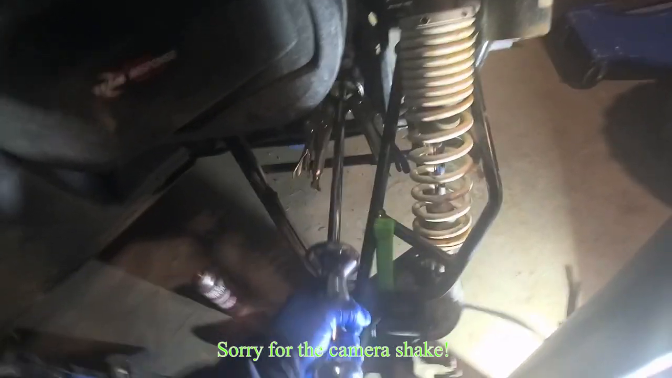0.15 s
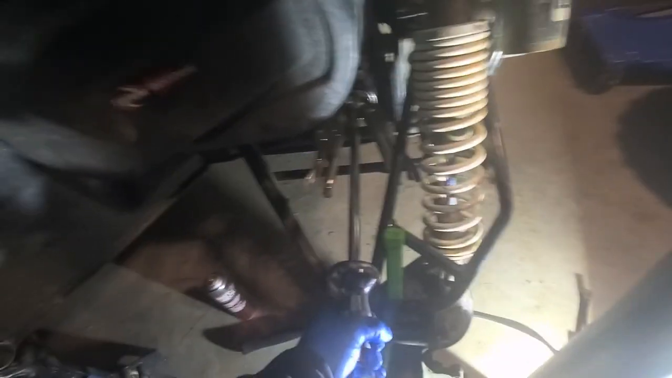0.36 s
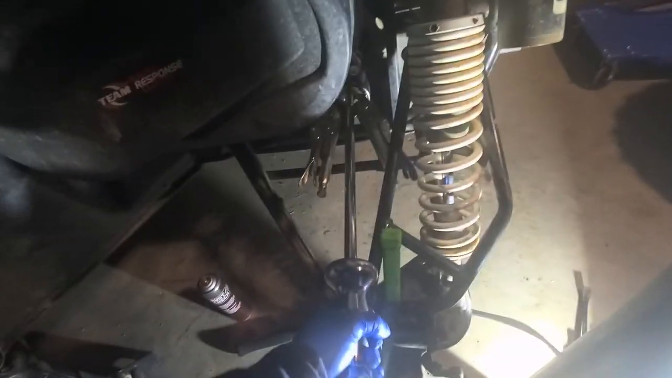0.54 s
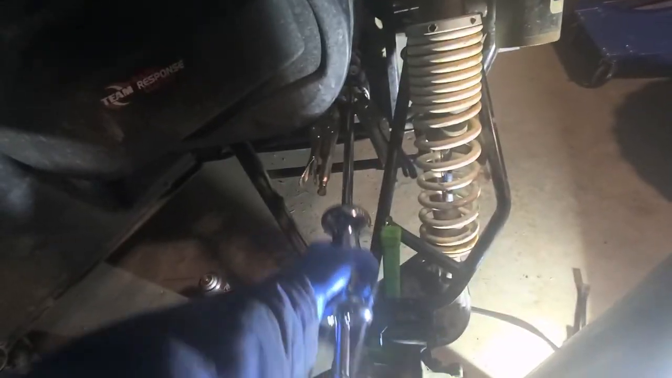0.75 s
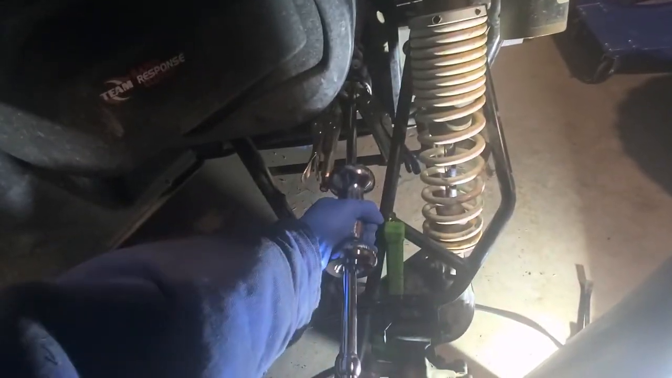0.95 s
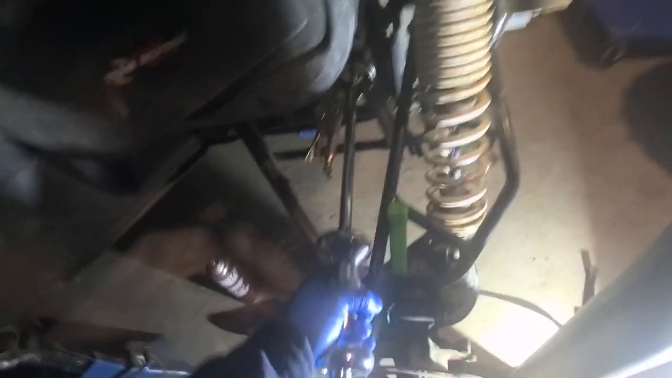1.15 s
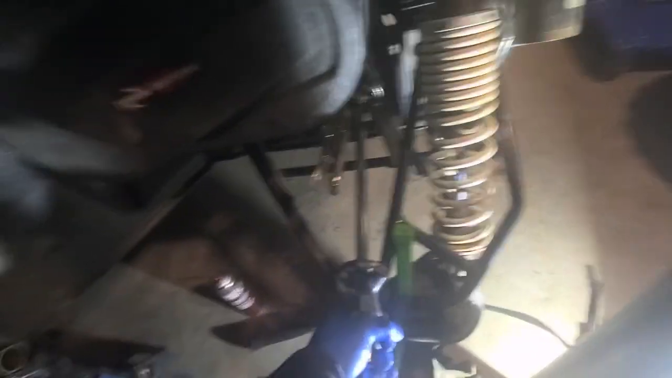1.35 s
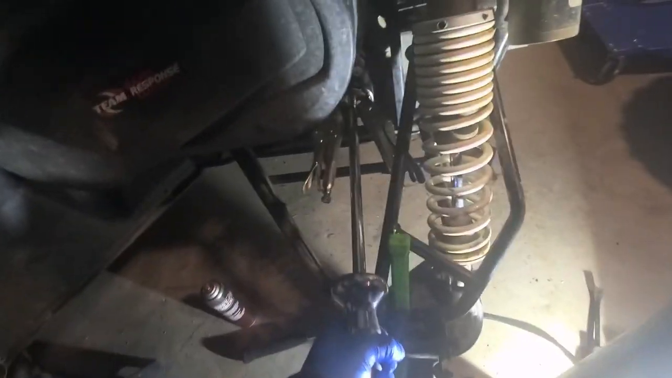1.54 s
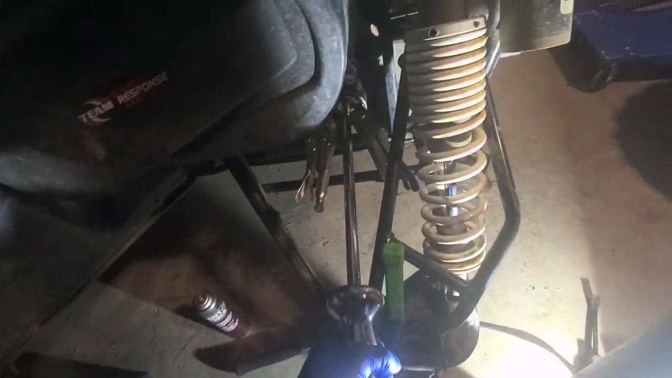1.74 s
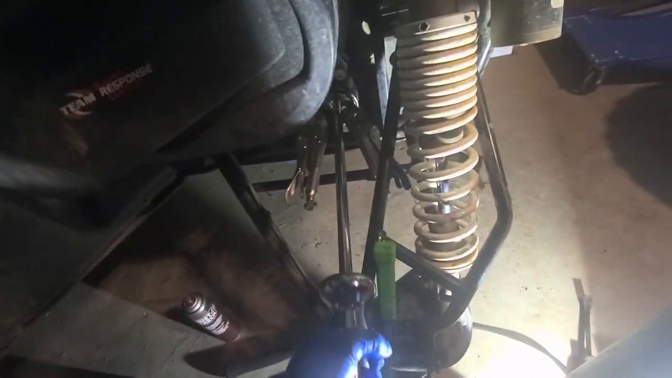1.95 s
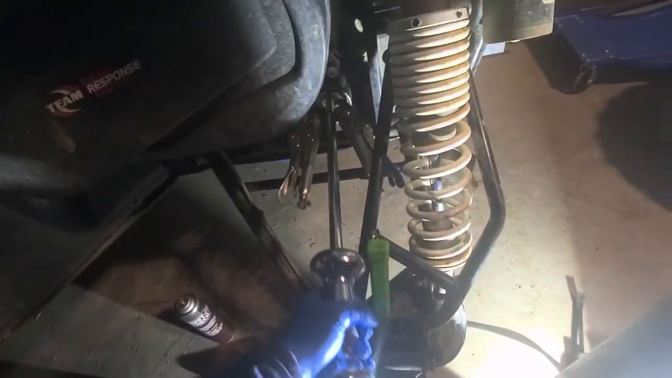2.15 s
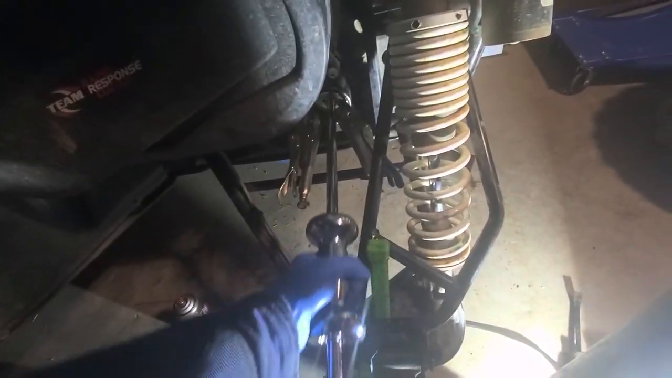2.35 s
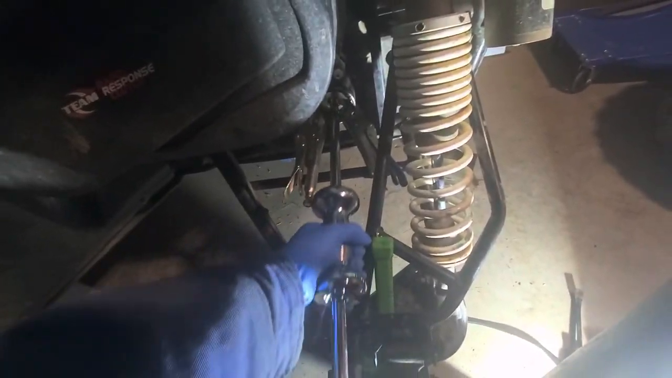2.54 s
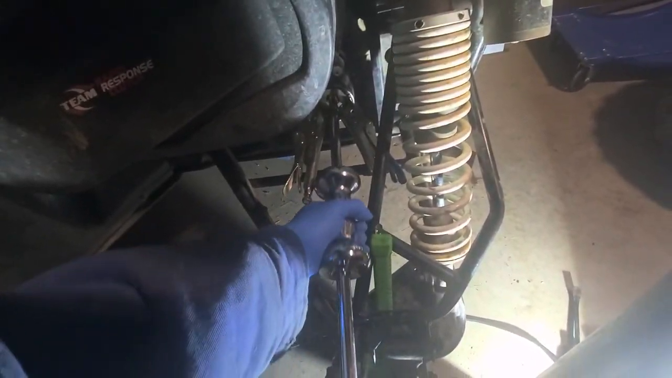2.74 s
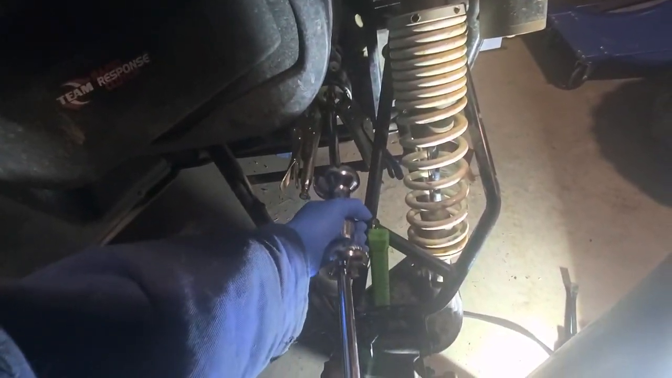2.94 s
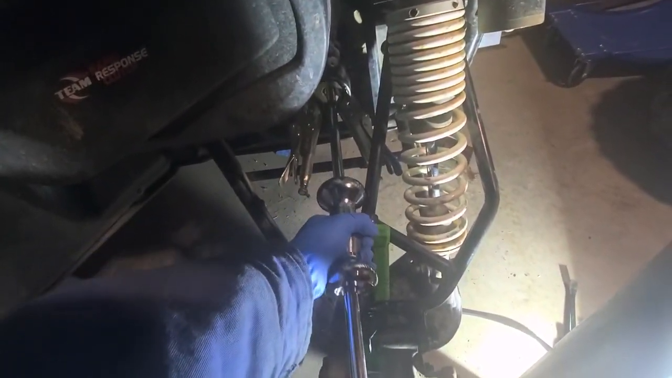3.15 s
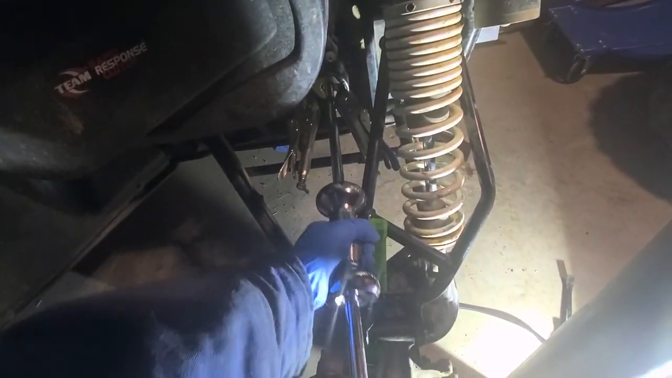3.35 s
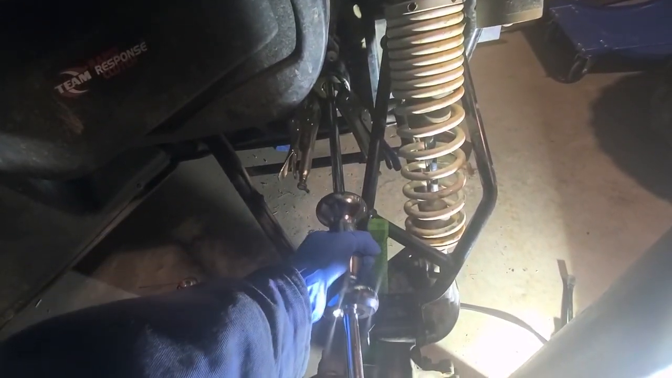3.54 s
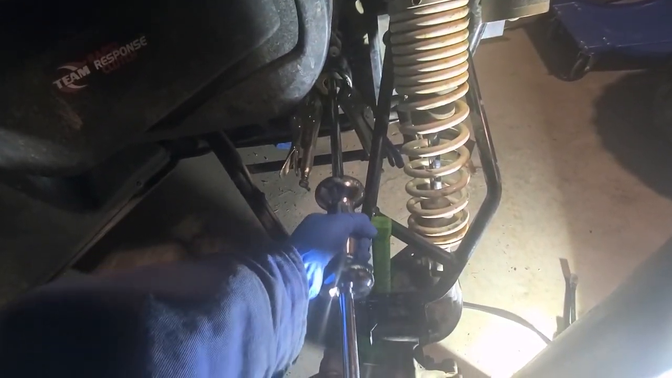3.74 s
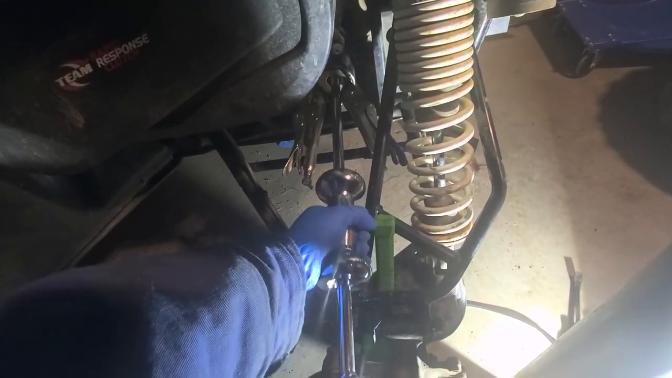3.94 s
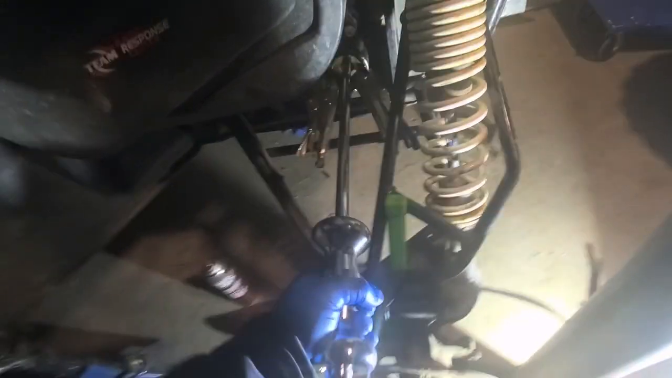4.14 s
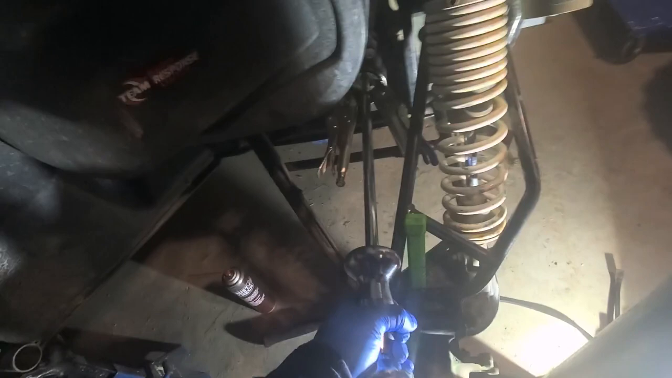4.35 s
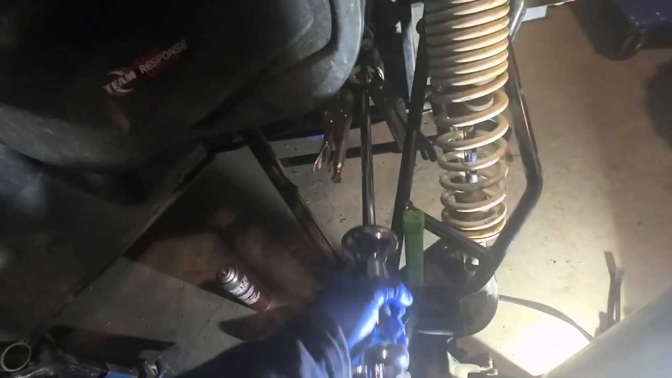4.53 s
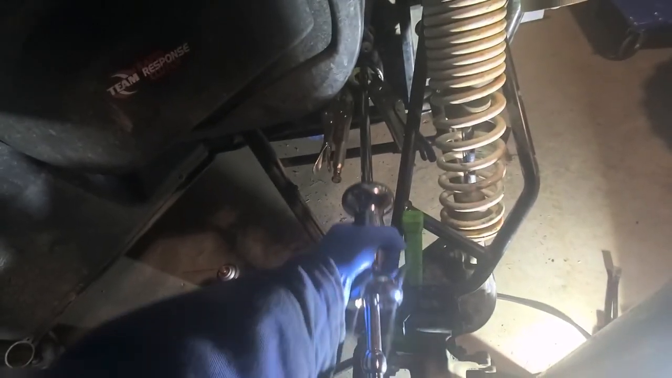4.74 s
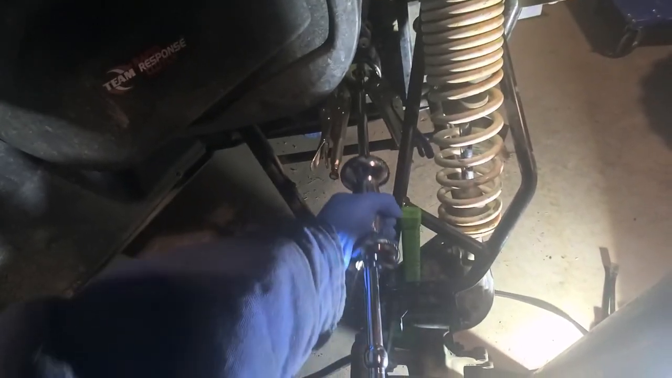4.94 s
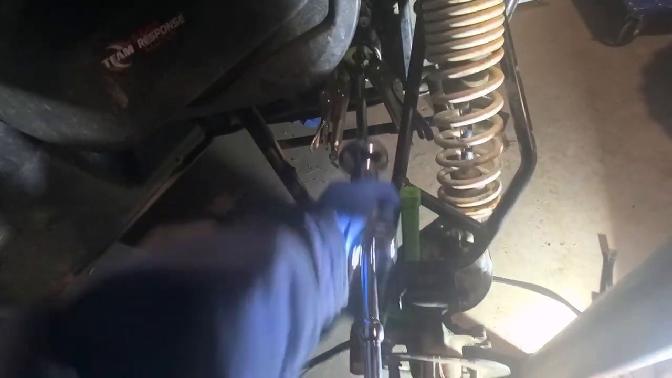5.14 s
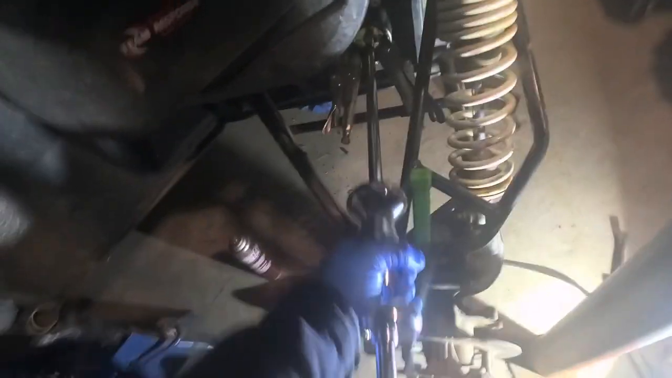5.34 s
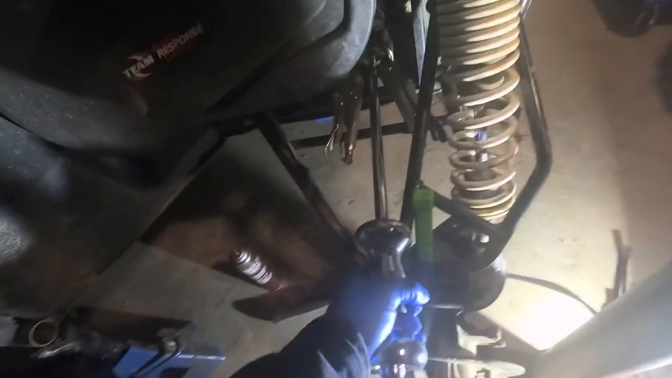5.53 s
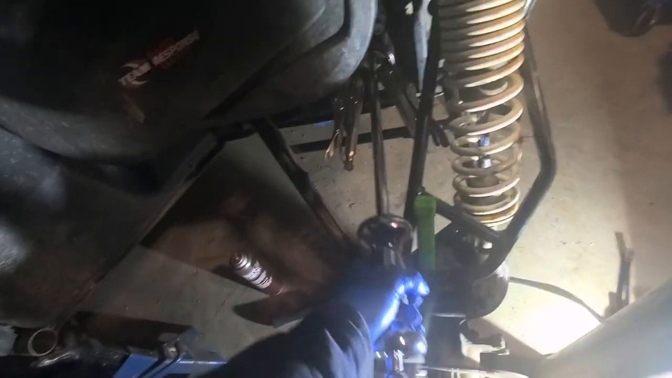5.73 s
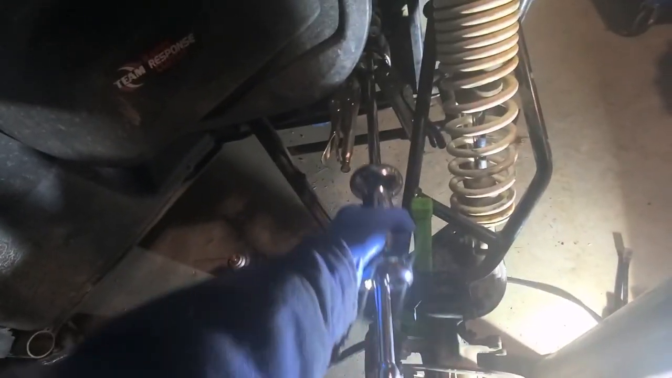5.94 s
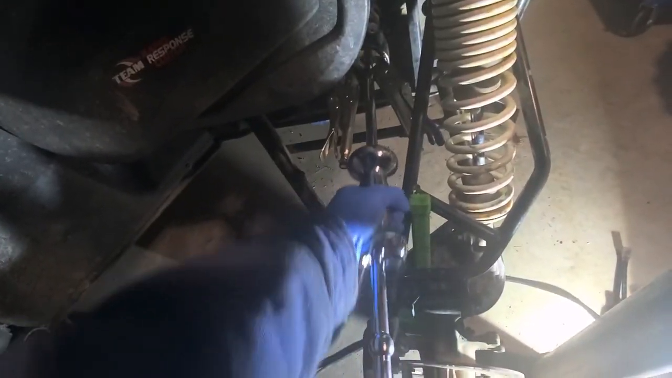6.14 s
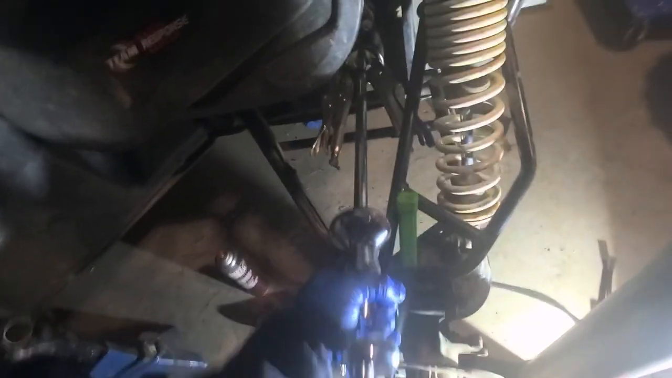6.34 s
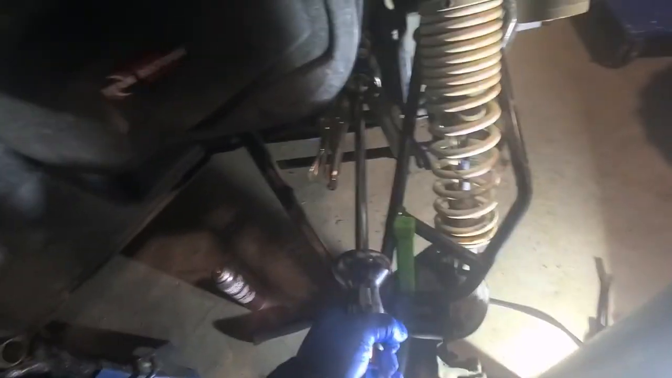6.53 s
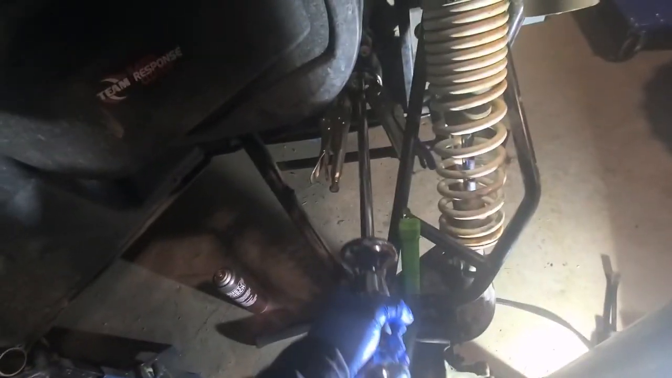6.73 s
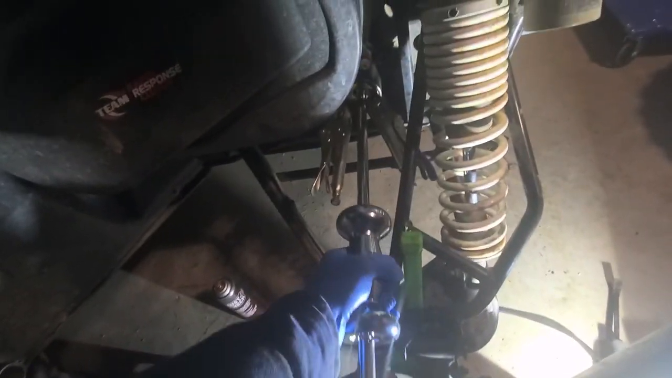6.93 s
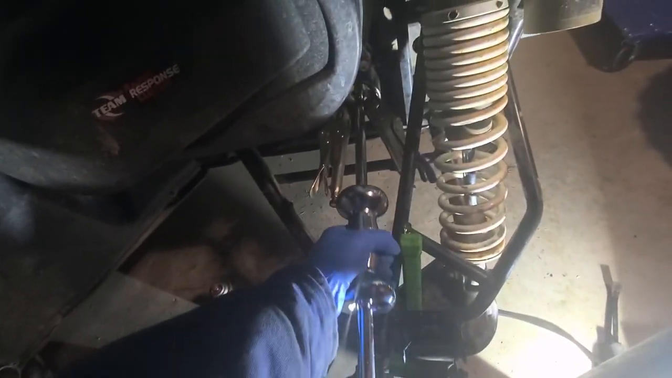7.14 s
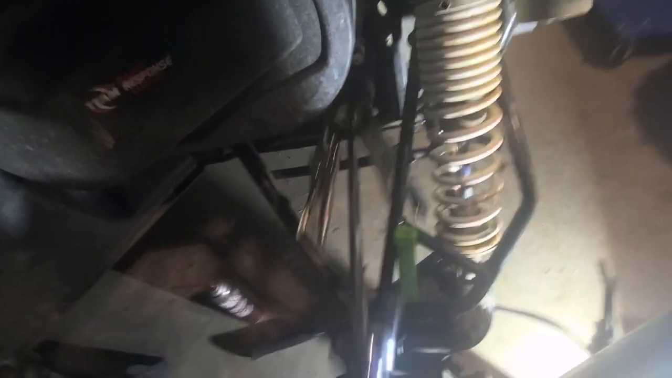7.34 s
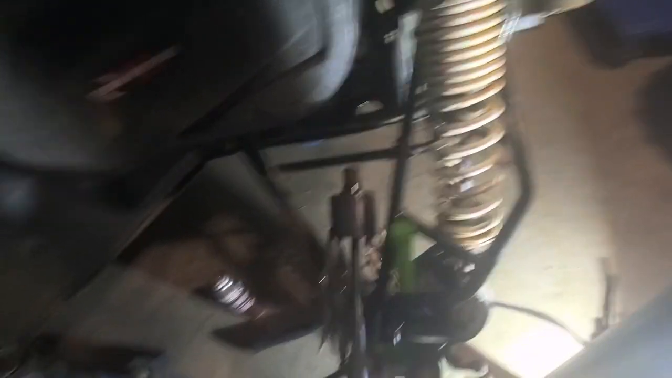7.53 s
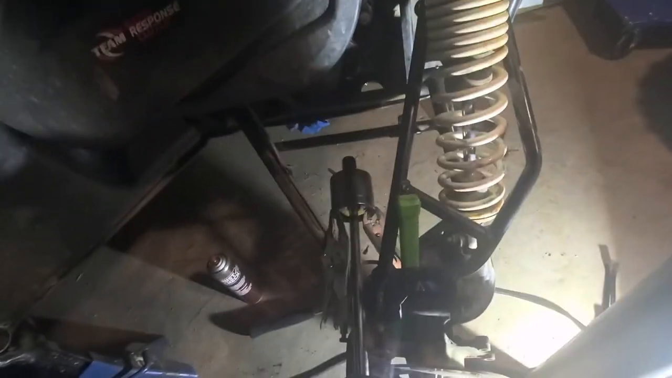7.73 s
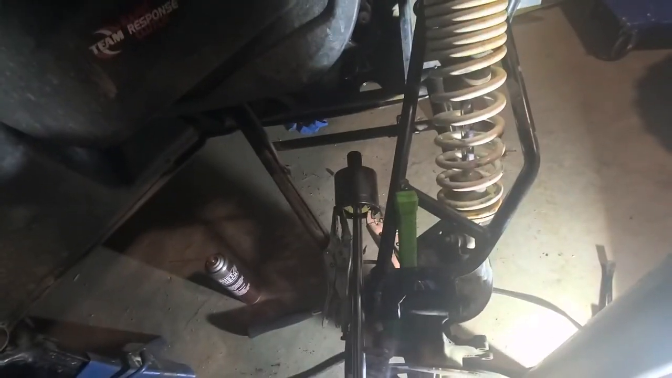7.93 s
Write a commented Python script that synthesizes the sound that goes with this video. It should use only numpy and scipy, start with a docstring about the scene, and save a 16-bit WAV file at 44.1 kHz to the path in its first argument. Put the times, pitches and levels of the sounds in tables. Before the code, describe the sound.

A heavy steel weight slides along a rod and clanks hard against its stop six times, then the tool bangs loose onto a metal frame.

```python
"""In a garage, a slide hammer is yanked again and again at a car's suspension, close to a stereo microphone.
The weight scrapes along the rod and clanks on the stop: noise bursts and struck decaying modes. Its blows
shake the chassis, it is pushed back with small taps, and dull knocks fall between. At last the puller comes
free, bangs onto the frame and bounces. Diffuse echoes answer, and a low rumble of shaped noise fills the room."""
import sys
import numpy as np
from scipy import signal
from scipy.fft import rfft, irfft
from scipy.io import wavfile

SR = 44100
rng = np.random.default_rng(int(sys.argv[2]) if len(sys.argv) > 2 else 0)


def put_to_file(sound):
    """Save the sound as 16-bit audio at rate SR, in the file named by the first command-line argument."""
    columns = np.atleast_2d(sound).T  # one column per channel
    safe = np.clip(columns, -1, 1)
    whole_steps = np.round(safe * 32767)
    wavfile.write(sys.argv[1], SR, whole_steps.astype(np.int16))


N = 351918

# Levels in the tables are relative, ahead of the mix.
# Building rumble. Each row: frequency in Hz, level in dB per Hz.
RUMBLE_SPECTRUM = [(15, -36.5), (25, -5), (59, -4.5), (149, -9.5), (217, -0.5), (285, -7.5), (439, -8.5),
                   (734, -23), (863, -22.5), (1190, -23.5), (3720, -38), (7510, -53), (13600, -44.5),
                   (16000, -61)]
# Blurred hums within it. Each row: centre in Hz, width in Hz, level in dB.
RUMBLE_HUMS = [(50, 10, 4), (217, 10, 8), (337, 6, 5), (375, 5, 4), (515, 3, 4)]
# Level of the low noise: the recorder holds it down before hits, and it rises under the last crash.
# Each row: time in seconds, level in dB.
RUMBLE_LEVEL = [(0, -62), (0.599, -56), (1.7, -58), (2.2, -65), (2.289, -65), (2.6, -55), (2.999, -62),
                (3.12, -61), (3.471, -62), (3.951, -58.5), (4.699, -56.5), (5.2, -66.5), (6.12, -63.5),
                (6.207, -65), (6.499, -59), (7.201, -61), (7.299, -85), (7.7, -41.5)]
# Weight sliding on the rod. Each row: start in seconds, length in seconds, first level in dB, last level in dB.
SLIDES = [(0.06, 0.051, -55, -69.5), (0.146, 0.068, -34, -44), (0.61, 0.031, -55.5, -50.5),
          (0.697, 0.096, -56, -58.5), (0.895, 0.12, -66, -75), (1.119, 0.031, -68.5, -66),
          (1.148, 0.033, -28, -32.5), (2.28, 0.13, -74, -67.5), (2.383, 0.21, -78, -79),
          (2.609, 0.05, -57, -60.5), (3.174, 0.062, -62, -53), (3.498, 0.083, -63.5, -78.5),
          (4.103, 0.05, -71.5, -62), (4.141, .029, -22, -22), (4.537, 0.069, -56, -43),
          (4.626, 0.13, -76, -75), (4.817, 0.16, -58.5, -80), (5.24, .055, -41, -42.5),
          (5.773, 0.021, -50.5, -59), (5.805, 0.26, -69, -70.5), (6.151, 0.028, -69, -76.5),
          (6.228, 0.1, -60, -39.5), (6.735, 0.22, -74, -64), (7.018, 0.065, -50, -75.5),
          (7.122, 0.048, -72, -83), (7.308, 0.054, -62, -41.5), (7.762, 0.036, -35.5, -44)]
# Weight touching rod or collar. Each row: start in seconds, ring level in dB, tick level in dB.
TAPS = [(0.0638, -59.5, -49), (0.616, -60, -53.5), (0.6946, -54.5, -55), (0.7390, -49, -40.5),
        (0.9007, -66.5, -53), (0.9628, -51, -40.5), (1.054, -66, -58.5), (1.883, -74.5, -65),
        (2.019, -73.5, -74.5), (2.352, -71, -64.5), (2.3785, -48, -45), (2.6215, -55.5, -39),
        (2.6574, -57, -38), (2.797, -57.5, -50), (3.1729, -55, -39), (3.2058, -53, -29.5),
        (3.224, -48, -35), (3.5129, -48.5, -38), (3.6212, -70.5, -58), (4.5444, -46.5, -45),
        (4.575, -46, -44.5), (4.6, -55, -40), (4.7636, -72.5, -50), (4.8223, -44.5, -42),
        (4.91, -78, -47.5), (4.9756, -75.5, -48), (5.769, -63.5, -54.5), (6.0811, -84, -51),
        (6.792, -59, -55), (6.846, -66.5, -58), (6.9172, -64.5, -47.5), (6.97, -64.5, -50.5),
        (7.0036, -44.5, -39), (7.128, -63, -46), (7.157, -67, -60), (7.7707, -57, -38),
        (7.7842, -41.5, -29.5), (7.797, -54, -45)]
# Weight on the stop. Each row: start in seconds, clank level in dB, clank hold in seconds, ring level in dB,
# level of the shock sent to the room in dB.
BLOWS = [(0.199, -14, 0.0081, -25.5, 20.5), (1.201, -14, 0.014, -24, 20),
         (4.186, -11.5, 0.006, -17.5, 21.5), (5.300, -20, 0.017, -14.5, 16.5),
         (6.320, -18.5, 0.0152, -17.5, 17), (7.378, -18.5, 0.013, -20.5, 18.5)]
# Rod and weight, ringing freely. Each row: mode in Hz, level in dB, 60 dB decay in seconds.
ROD_MODES = [(2030, -14, .03), (2290, -18, .1), (2910, -9, .035), (3780, -8, .025), (3990, -14, .04),
             (5230, 0, .05), (5850, -10, .04), (6520, -6, .07), (6860, -14, .05), (8010, -1, .06),
             (8600, -14, .05), (9100, -14, .04), (9650, -4, .06), (10850, -14, .05), (11390, -1, .07),
             (12400, -20, .04), (13250, -9, .06), (15170, -20, .04)]
# Bare noise of steel on the stop. Each row: frequency in Hz, level in dB per Hz.
CLANK_SPECTRUM = [(290, -42.5), (500, -14), (3770, -7.5), (4550, -10), (5190, -2.5), (7270, -6.5),
                  (7940, -1), (8800, -5.5), (11600, -2), (15600, -13.5), (16500, -27)]
# Chassis shaken through the puller. Each row: start in seconds, thump level in dB, panel level in dB.
SHAKES = [(0.204, -10.5, -24), (0.747, -42, -62), (0.966, -29.5, -51), (1.07, -45, -64),
          (1.214, -16.5, -27), (2.377, -41.5, -60), (2.625, -29, -49), (3.214, -38, -44.5),
          (3.52, -41, -51), (4.197, -15.5, -27), (4.832, -28, -49.5), (5.309, -20.5, -32),
          (6.335, -21, -31.5), (7.013, -26, -60.5), (7.135, -44, -58), (7.382, -30.5, -35.5),
          (7.52, -27, -19)]
# Chassis panels. Each row: mode in Hz, level in dB, 60 dB decay in seconds.
PANEL_MODES = [(140, 2, 0.022), (181.3, 1.5, 0.091), (218, -3.5, 0.12), (266.6, -4.5, 0.091),
               (327, -3, 0.057), (395, -3.5, 0.071), (437.3, -12, 0.17), (599, -14, 0.024),
               (742, -10, 0.051)]
# Sway of the whole chassis. Each row: mode in Hz, level in dB, 60 dB decay in seconds.
SWAY_MODES = [(53, 0, .5)]
# Thump of the whole chassis. Each row: mode in Hz, level in dB, 60 dB decay in seconds.
THUMP_MODES = [(98, 0, .075)]
# Dull knocks near a kilohertz. Each row: start in seconds, level in dB.
KNOCKS = [(1.583, -58), (1.618, -53.5), (2.986, -65), (3.175, -45.5), (3.204, -38.5), (5.643, -58.5),
          (5.675, -50.5)]
# Modes of a knock. Each row: mode in Hz, level in dB, 60 dB decay in seconds (ring() allows 5 ms at least).
KNOCK_MODES = [(723, -1.5, 0.047), (1170, 8.5, 0.0033), (1425, -3, 0.032)]
# Freed puller banging and bouncing on the frame. Each row: start in seconds, level in dB.
BANGS = [(7.518, 4.5), (7.571, -4.5), (7.598, -5), (7.638, -17.5), (7.745, -12.5)]
# Frame under the puller. Each row: mode in Hz, level in dB, 60 dB decay in seconds.
FRAME_MODES = [(161.7, -4, 0.18), (206, -0.5, 0.1), (312.4, -0.5, 0.075), (383.3, -11, 0.12),
               (513.4, -10.5, 0.058), (697, -5, 0.072), (751.4, -6, 0.067), (866, -21, 0.42),
               (1266, -13, 0.098), (1730, -26, 0.041), (1984, -10.5, 0.16), (2300, -21, 0.029),
               (3030, -25.5, 0.03), (3850, -27, 0.047)]
# Tone of the garage echoes. Each row: frequency in Hz, level in dB.
ROOM_COLOUR = [(60, 1.5), (250, -1.5), (700, 3.5), (1500, -3.5), (3000, -1.5), (5500, -4.5), (7300, -8),
               (9000, -5), (12000, -5.5), (16000, 0)]
# Dying away of the echoes. Each row: frequency in Hz, 60 dB decay in seconds.
ECHO_T60 = [(60, 1), (280, 0.7), (740, 0.58), (1940, 0.41), (5120, 0.44), (13500, 0.28)]
# Left-right likeness of diffuse sound. Each row: frequency in Hz, likeness from -1 to 1.
LIKENESS = [(60, 1), (180, 0.96), (550, 0.69), (1650, 0.46), (4970, -0.15), (15000, -0.47)]
# Phase between the microphone ports. Each row: frequency in Hz, lead of the left in radians.
LEFT_LEAD = [(100, 0), (500, 0), (1500, 1.4), (4000, 0.75), (8000, 1.6), (16000, 1.2)]
# Level between the microphone ports. Each row: frequency in Hz, left minus right in dB.
LEFT_LEAN = [(60, 3), (150, 5.5), (380, 5.5), (950, -2), (2380, -1), (5980, -2.5), (15000, 4)]

SLIDE_ATTACK_S, SLIDE_RELEASE_DB_PER_S = 0.0065, 1200
FLUTTER_DB = 2.5   # the pressure of the sliding weight wavers
CATCH_PER_S, CATCH_SPREAD_DB = 3000, 3.5
CHATTER_PER_S, CHATTER_DB = 10, 1   # loose knocks while the weight slides, against the steady pressure
RUB_INTO_ROD_DB, GRIT_DB = -27, -8.5   # what a stroke feeds to the ring and to bare contact noise
TAP_BRIGHT_DB_PER_OCTAVE = -4   # light touches favour the lower modes
LIGHT_RING_MAX_S = .058   # longest ring after a light touch
BLOW_DAMPING = .9   # share of the free ring time left after a full blow
REBOUND_DB, REBOUND_AT = -4, 0.61   # the weight bounces once on the stop, at this share of the clank hold
SWAY_OVER_PANELS_DB = -4.5   # sway follows how hard the panels are jarred
BASS_TO_ROOM_DB = -15   # thump and sway are heard mostly direct
BOUNCE_DULL_DB = -10.5   # bounces crack less than the first bang
HISS_DB, TOP, CUTOFF_HZ = -89, .9, 16900   # microphone noise before the top cut, recorder ceiling, steep edge


def amp(db):
    """Decibels to gain."""
    return 10 ** (np.asarray(db) / 20)


def rms_one(x):
    """Scale to unit rms."""
    return x / np.sqrt(np.mean(x ** 2) + 1e-20)


def at_hz(points, hz):
    """Read a table on a log-frequency axis."""
    table_hz, value = np.array(points).T
    return np.interp(np.log(hz + 1), np.log(table_hz), value)


def coloured(x, spectrum):
    """Weight a signal's spectrum by a table."""
    size = x.shape[-1]
    gain = amp(at_hz(spectrum, np.fft.rfftfreq(size, 1 / SR)))
    return irfft(rfft(x) * gain, size)


def filtered(x, order, hz, kind="low"):
    """Butterworth slope."""
    return signal.sosfilt(signal.butter(order, hz, kind, fs=SR, output="sos"), x)


def diffuse(size):
    """Stereo white noise whose two sides are alike in the bass and part in the treble."""
    alike = np.clip(at_hz(LIKENESS, np.fft.rfftfreq(size, 1 / SR)), -1, 1)
    mid, side = rfft(rng.standard_normal((2, size)))
    return irfft(np.sqrt(1 + alike) * mid + np.sqrt(1 - alike) * side * [[1], [-1]], size)


def wander(rate):
    """Slow chance: straight lines between random points of spread 1, rate points a second."""
    knots = rng.standard_normal(int(8 * rate) + 2)
    return np.interp(np.arange(N) / SR * rate, np.arange(len(knots)), knots)


def bursts(times, levels_db, holds, fall_s):
    """Envelope of bursts that start at once, hold and die away."""
    t, out = np.arange(N) / SR, np.zeros(N)
    for start, db, hold in zip(times, levels_db, holds):
        first = int(start * SR)
        since = t[first:int((start + .2) * SR)] - start
        out[first:first + len(since)] += amp(db) * np.exp(-np.maximum(since - hold, 0) / fall_s)
    return out


def ring(force, hz, t60):
    """One mode as a two-pole resonator: a unit click sets a decaying sine of height about 1 ringing."""
    radius = amp(-60 / (max(t60, .005) * SR))
    angle = 2 * np.pi * hz / SR
    poles = [1, -2 * radius * np.cos(angle), radius * radius]
    return signal.lfilter([0, np.sin(angle)], poles, force + 1e-18)


def all_modes(db, modes):
    """The same level for every mode."""
    return np.repeat(np.asarray(db, float)[:, None], len(modes), axis=1)


def strike(times, levels_db, modes, spread_db, steady=0, patchy_db=0):
    """Each contact strikes every mode with its own strength and sign; a steady force feeds them in patches."""
    at, out = (np.asarray(times) * SR).astype(int), np.zeros(N)
    luck = rng.standard_normal((len(at), len(modes), 2))
    for k, (hz, db, t60) in enumerate(modes):
        force = np.zeros(N)
        strength_db = np.asarray(levels_db)[..., k] + spread_db * luck[:, k, 0]
        force[at] = amp(strength_db) * np.sign(luck[:, k, 1])
        patches = amp(patchy_db * wander(28) if patchy_db else 0)
        out += amp(db) * ring(force + steady * patches, hz, t60)
    return out


def pushed(x, length_s):
    """A force spread over a short time instead of a click."""
    push = np.hanning(int(length_s * SR))
    return np.convolve(x, push / push.sum())[:N]


def rumble():
    """Low noise of the building with a few blurred hums in it."""
    hz = np.fft.rfftfreq(N, 1 / SR)
    shape = amp(at_hz(RUMBLE_SPECTRUM, hz))
    for centre_hz, width_hz, db in RUMBLE_HUMS:
        shape = shape + amp(db) / np.sqrt(1 + (2 * (hz - centre_hz) / width_hz) ** 4)
    s, db = np.transpose(RUMBLE_LEVEL)
    level = amp(np.interp(np.arange(N) / SR, s, db))
    return level * rms_one(irfft(rfft(diffuse(N)) * shape, N))


def strokes():
    """Pressure of the sliding weight: quick start, even swell or fade in dB, steady release."""
    t, out = np.arange(N) / SR, np.zeros(N)
    for start, length, first_db, last_db in SLIDES:
        first = int(start * SR)
        since = t[first:int((start + length + .3) * SR)] - start
        db = np.interp(since, [0, length], [first_db, last_db])
        db = db - SLIDE_RELEASE_DB_PER_S * np.maximum(since - length, 0)
        out[first:first + len(since)] += amp(db) * np.minimum(since / SLIDE_ATTACK_S, 1)
    return out


def sliding():
    """Wavering pressure with loose knocks, and the dense uneven catches of rough steel on steel."""
    pressure = strokes() * amp(FLUTTER_DB * wander(45))
    catch_size = amp(CATCH_SPREAD_DB * rng.exponential(1, N).clip(0, 4))
    catches = (rng.random(N) < CATCH_PER_S / SR) * catch_size * rng.choice([-1, 1], N)
    loose = rng.random(N) < CHATTER_PER_S / SR
    chatter = signal.lfilter([1], [1, -np.exp(-1 / (0.0029 * SR))], loose)
    return pressure * (1 + amp(CHATTER_DB) * chatter), rms_one(catches)


def hammer():
    """Blows, taps and sliding all ring the rod; bare contact noise lies under the ringing."""
    scrape, catches = sliding()
    tap_s, tap_db, tick_db = np.transpose(TAPS)
    blow_s, clank_db, hold, ring_db, room_db = np.transpose(BLOWS)

    noise = rms_one(coloured(rng.standard_normal(N), CLANK_SPECTRUM))
    clank = noise * bursts(blow_s, clank_db, hold, fall_s=0.0017) * amp(2.5 * wander(220))
    dull = filtered(noise, 2, 5500)   # light contacts are softer
    grit = scrape * amp(GRIT_DB + 1.6 * wander(48))
    ticks = dull * (bursts(tap_s, tick_db, 0 * tap_s, fall_s=0.0094) + grit)

    octaves = np.log2(np.array(ROD_MODES)[:, 0] / 6000)
    tap_levels = tap_db[:, None] + TAP_BRIGHT_DB_PER_OCTAVE * octaves
    short_ringing = [(hz, db, min(t60, LIGHT_RING_MAX_S)) for hz, db, t60 in ROD_MODES]
    rubbing = amp(RUB_INTO_ROD_DB) * scrape * catches
    light = strike(tap_s, tap_levels, short_ringing, spread_db=4.5, steady=rubbing, patchy_db=6.0)

    # the hand on the weight damps the ring of a full blow
    damped = [(hz, db, BLOW_DAMPING * t60) for hz, db, t60 in ROD_MODES]
    hit_s = np.append(blow_s, blow_s + REBOUND_AT * hold)
    hit_db = np.append(ring_db, ring_db + REBOUND_DB)
    heavy = strike(hit_s, all_modes(hit_db, ROD_MODES), damped, spread_db=1.0)

    shock = np.zeros(N)
    shock[(blow_s * SR).astype(int)] = amp(room_db)
    to_room = coloured(shock, CLANK_SPECTRUM) + amp(-14.0) * clank + amp(-7.5) * heavy
    return clank + heavy + light + ticks, to_room + amp(-7) * (light + ticks)


def microphone_ports(x):
    """Direct sound reaches the two ports with a difference in phase and level."""
    hz = np.fft.rfftfreq(N, 1 / SR)
    half = amp(at_hz(LEFT_LEAN, hz) / 2) * np.exp(.5j * at_hz(LEFT_LEAD, hz))
    return irfft(rfft(x) * np.array([half, 1 / half]), N)


def garage(x, colour):
    """Dense reflections: diffuse noise that dies band by band, folded with the sound."""
    size = SR   # one second of echo
    t, hz = np.arange(size) / SR, np.fft.rfftfreq(size, 1 / SR)
    white, edges = rfft(diffuse(size)), np.geomspace(20, SR / 2, 20)
    tail = 0
    for low, high in zip(edges, edges[1:]):
        band = irfft(white * ((hz >= low) & (hz < high)), size)
        tail = tail + band * amp(-60 * t / at_hz(ECHO_T60, np.sqrt(low * high)))
    build_up, fade_out = np.clip(t / .012, 0, 1), np.clip(5 - 5 * t, 0, 1)
    tail = coloured(tail, colour) * build_up * fade_out
    tail = tail / np.sqrt(np.sum(tail ** 2) / 2)   # unit energy per side, on average
    return signal.fftconvolve(x[None], tail, axes=1)[:, :N]


def chassis():
    """A soft push through the puller sways and thumps the whole; its sharp start rings the panels."""
    s, thump_db, panels_db = np.transpose(SHAKES)
    thump = pushed(strike(s, thump_db[:, None], THUMP_MODES, spread_db=0.5), 0.0051)
    sway_db = panels_db[:, None] + SWAY_OVER_PANELS_DB
    sway = pushed(strike(s, sway_db, SWAY_MODES, spread_db=4.5), 0.012)
    panels = strike(s, all_modes(panels_db, PANEL_MODES), PANEL_MODES, spread_db=3.0)
    return thump + sway, panels


def knocks():
    """Short dull knocks: a few milliseconds of rough contact into three modes."""
    s, db = np.transpose(KNOCKS)
    contact = rng.standard_normal(N) * bursts(s, db - 24, 0 * s + .006, fall_s=.003)
    return sum(amp(level_db) * ring(contact, hz, t60) for hz, level_db, t60 in KNOCK_MODES)


def puller_falls():
    """A bang on the frame and its bounces ring the modes; a rattle that dies out feeds them too."""
    s, db = np.transpose(BANGS)
    grains = (rng.random(N) < 120 / SR) * rng.standard_normal(N)
    rattle = grains * bursts(s[:1], [-24], [.06], fall_s=0.031)
    crack_db = db - 7 + BOUNCE_DULL_DB * (s > s[0])
    crack = filtered(rng.standard_normal(N) * bursts(s, crack_db, 0 * s, fall_s=0.015), 2, 4000)
    bang = strike(s, all_modes(db - 15.5, FRAME_MODES), FRAME_MODES, spread_db=2.5, steady=rattle)
    return filtered(bang + crack, 3, 130, "high")   # keep deep bass out of the bang


def scene():
    """Near sources, their room sound and the rumble."""
    background = rumble()
    tool, tool_to_room = hammer()
    low, panels = chassis()
    knock, fall = knocks(), puller_falls()
    near = tool + low + panels + knock + fall
    to_room = tool_to_room + amp(BASS_TO_ROOM_DB) * low + amp(-0.5) * panels
    to_room = to_room + amp(-11.5) * knock + amp(-8) * fall
    return microphone_ports(near) + garage(to_room, ROOM_COLOUR) + background


def record(dry):
    """The microphone drops the deep bass, peaks are rounded; the top is cut by a slope, then a steep edge."""
    dry = filtered(dry, 4, 44, "high")
    dry = signal.lfilter(*signal.iirnotch(7350, 9, fs=SR), dry)   # a dip from the housing
    dry = TOP * np.tanh(dry / TOP)
    dry = dry + amp(HISS_DB) * rng.standard_normal(dry.shape)
    dry = filtered(dry, 20, 16000)
    return signal.sosfilt(signal.cheby2(12, 70, CUTOFF_HZ, fs=SR, output="sos"), dry)


dry = scene()
out = record(dry)
put_to_file(out)
```